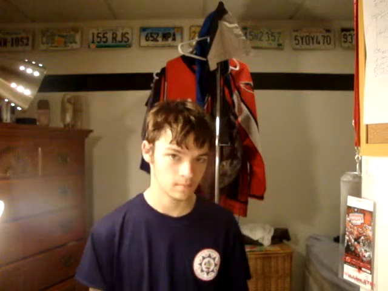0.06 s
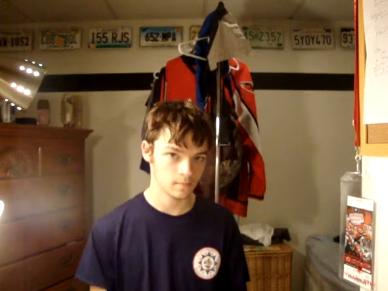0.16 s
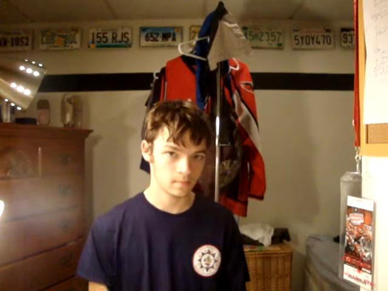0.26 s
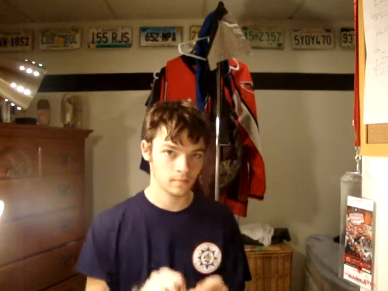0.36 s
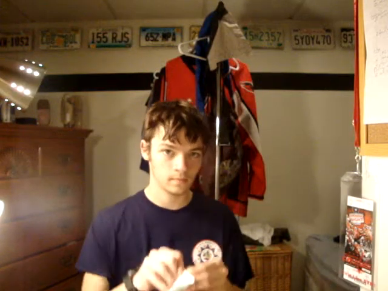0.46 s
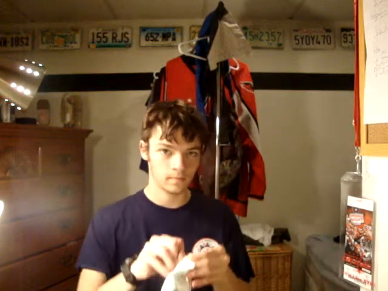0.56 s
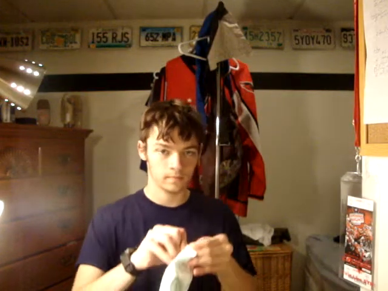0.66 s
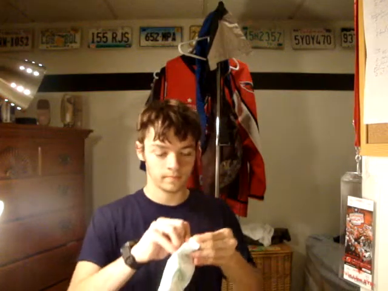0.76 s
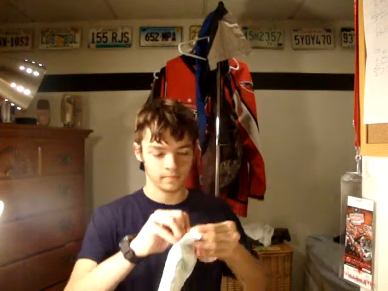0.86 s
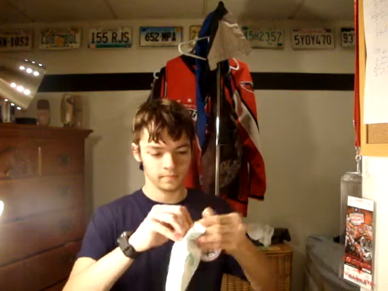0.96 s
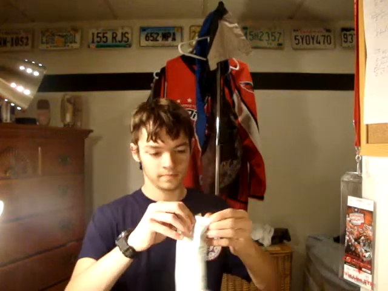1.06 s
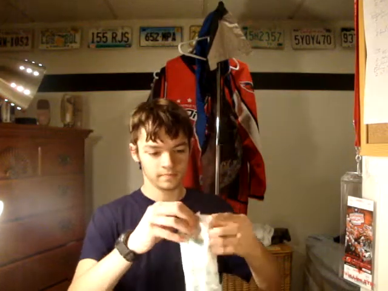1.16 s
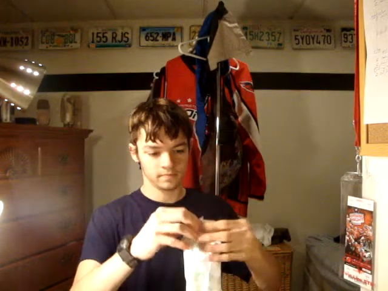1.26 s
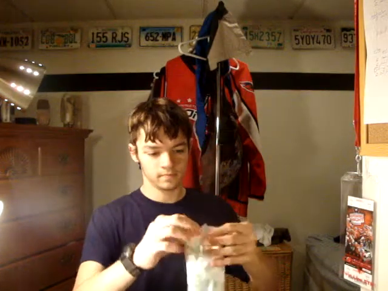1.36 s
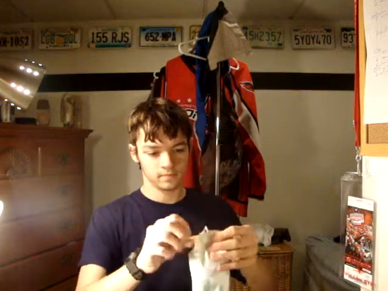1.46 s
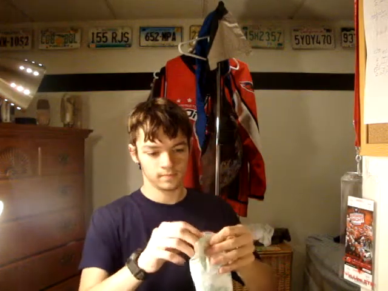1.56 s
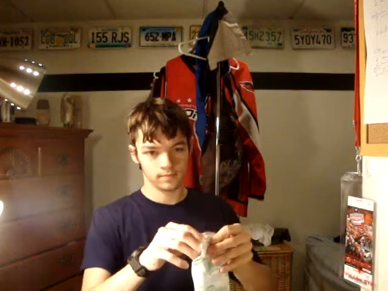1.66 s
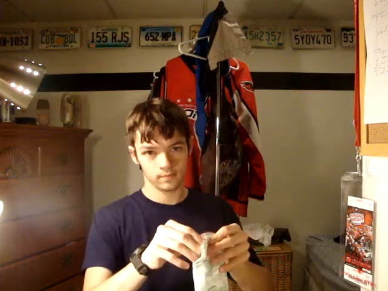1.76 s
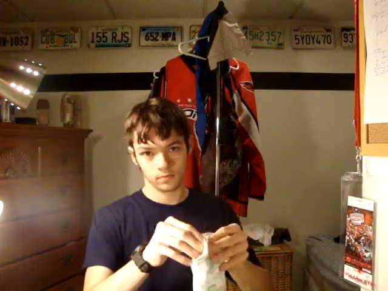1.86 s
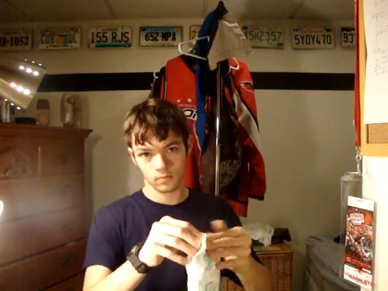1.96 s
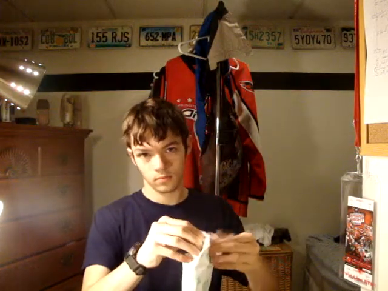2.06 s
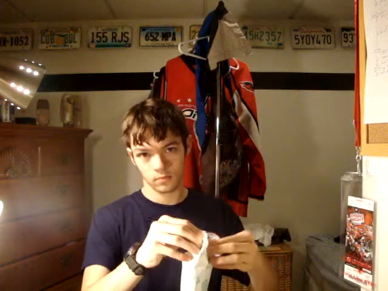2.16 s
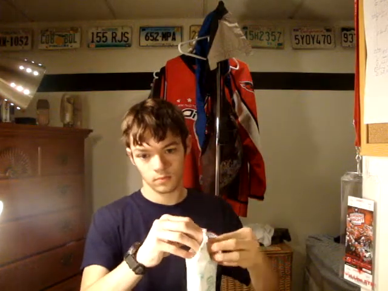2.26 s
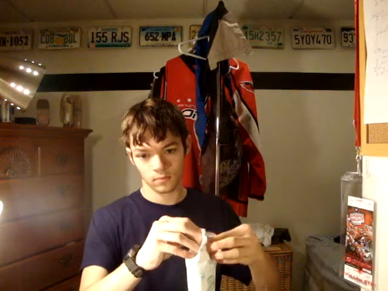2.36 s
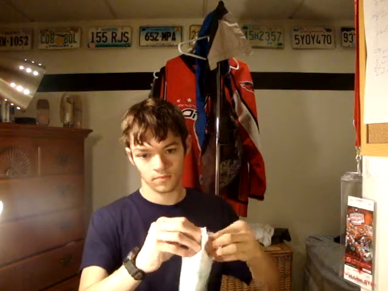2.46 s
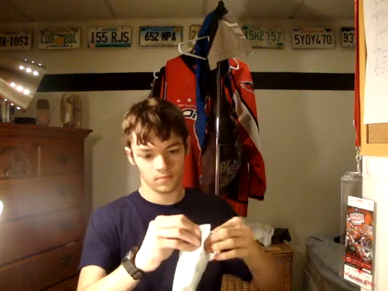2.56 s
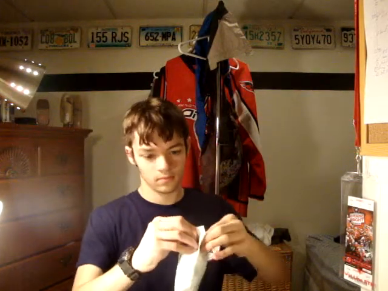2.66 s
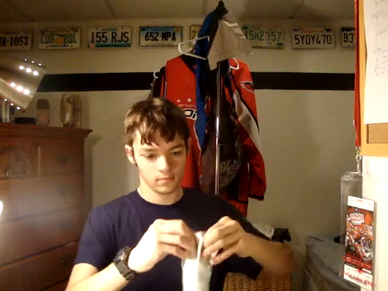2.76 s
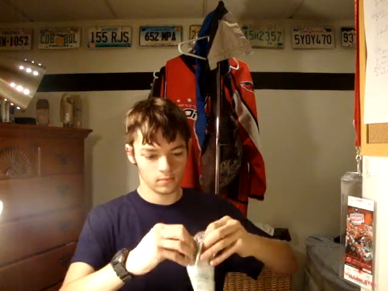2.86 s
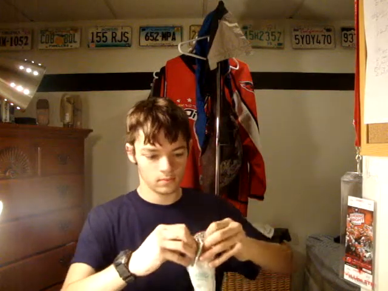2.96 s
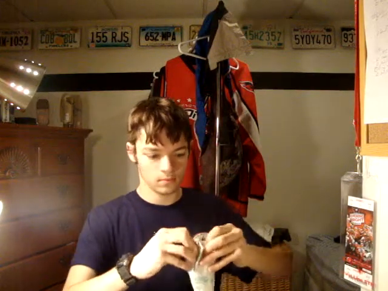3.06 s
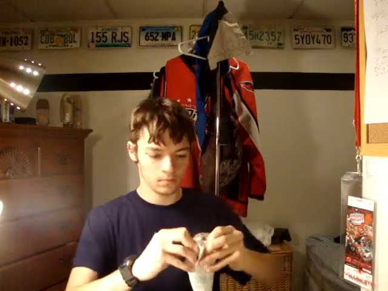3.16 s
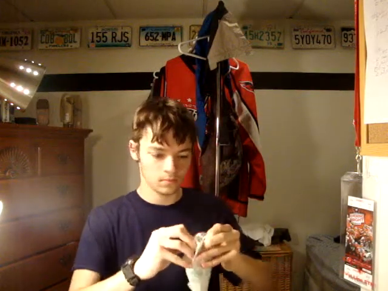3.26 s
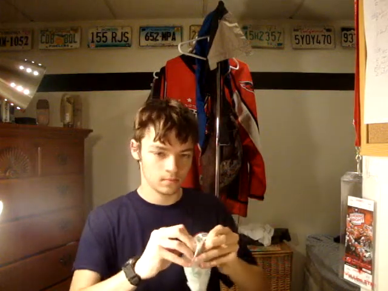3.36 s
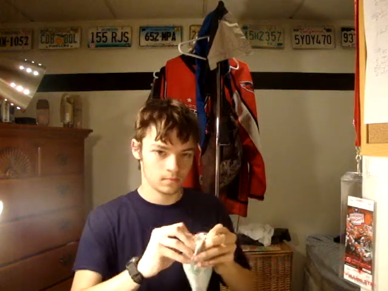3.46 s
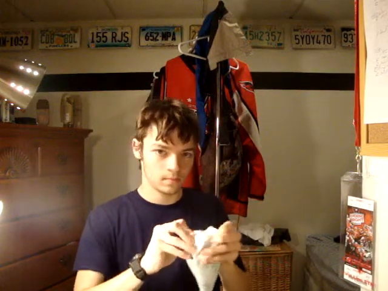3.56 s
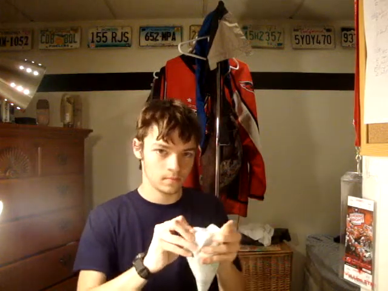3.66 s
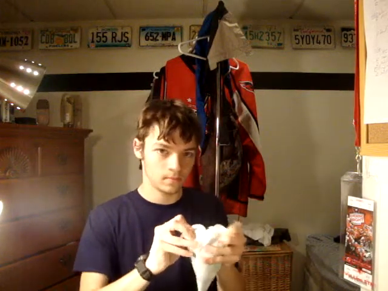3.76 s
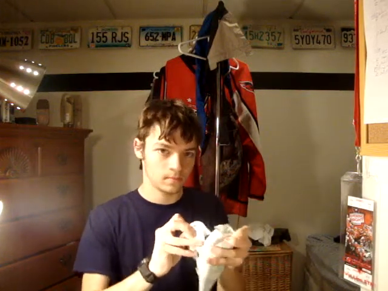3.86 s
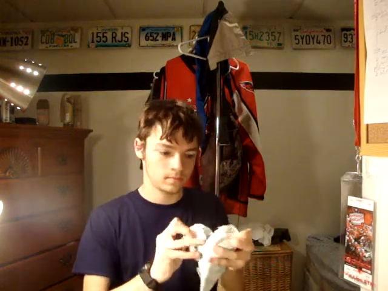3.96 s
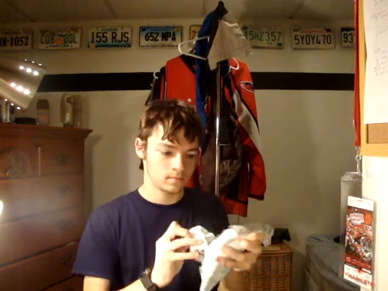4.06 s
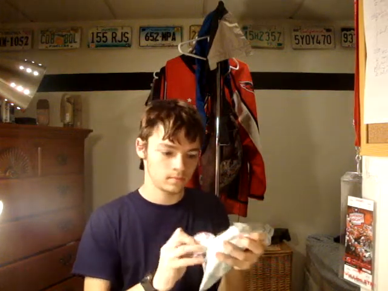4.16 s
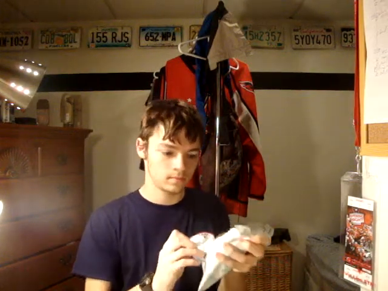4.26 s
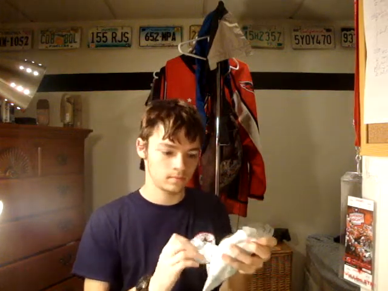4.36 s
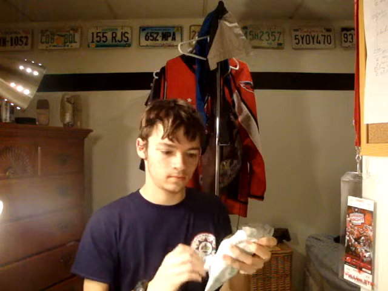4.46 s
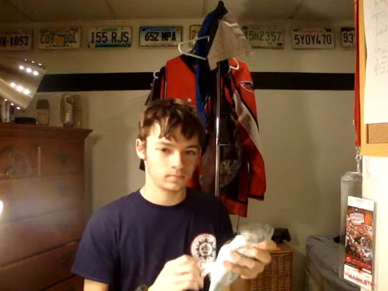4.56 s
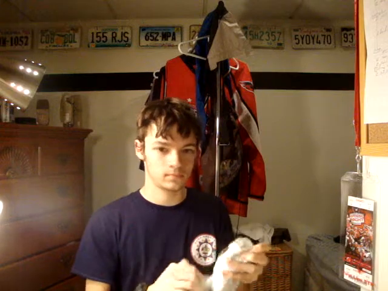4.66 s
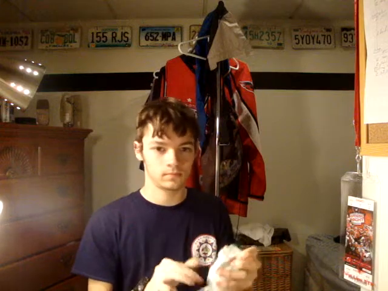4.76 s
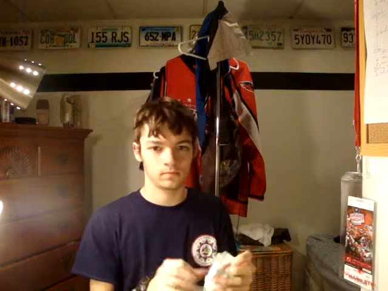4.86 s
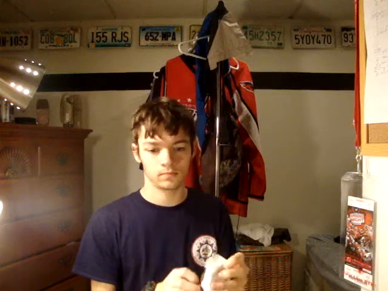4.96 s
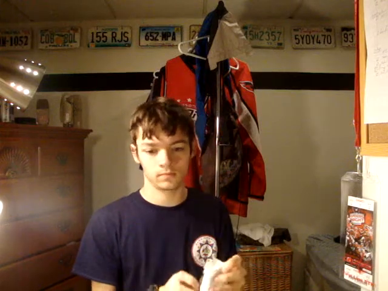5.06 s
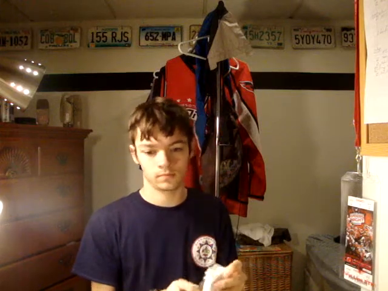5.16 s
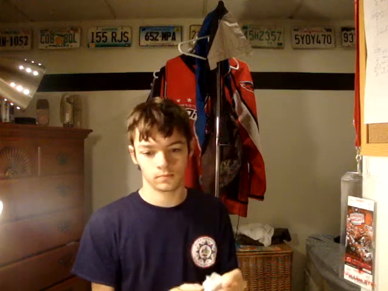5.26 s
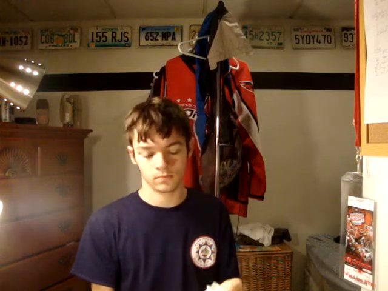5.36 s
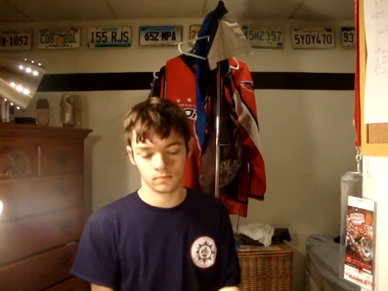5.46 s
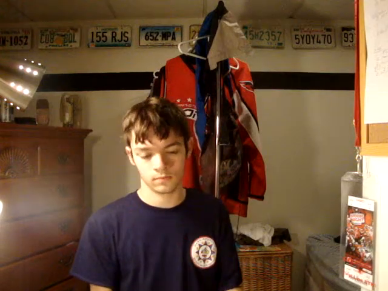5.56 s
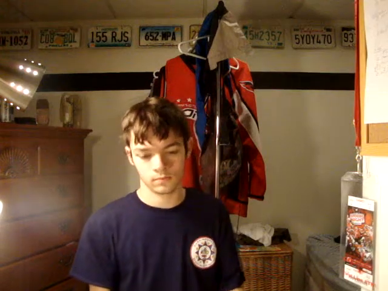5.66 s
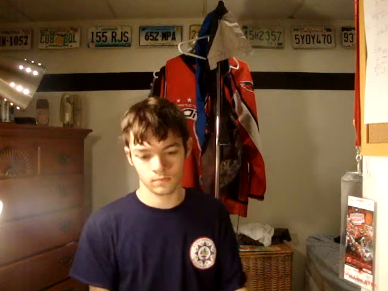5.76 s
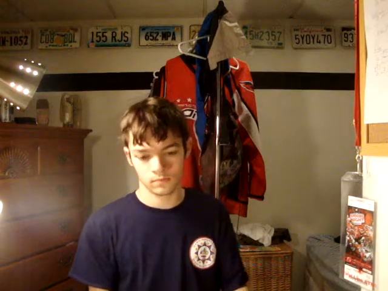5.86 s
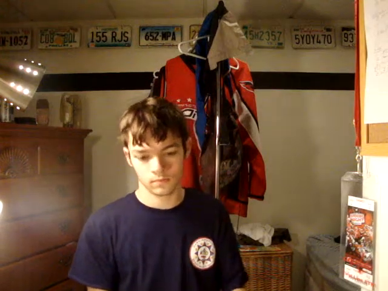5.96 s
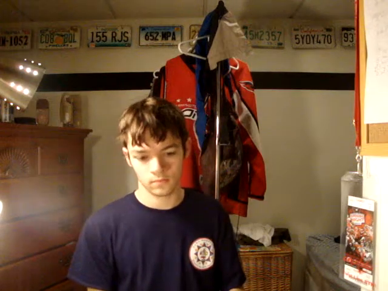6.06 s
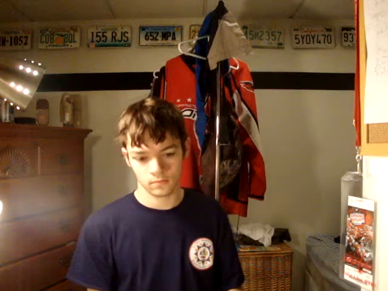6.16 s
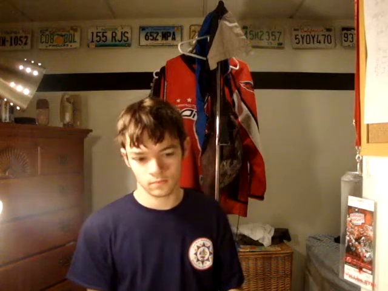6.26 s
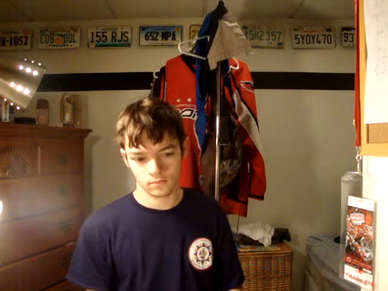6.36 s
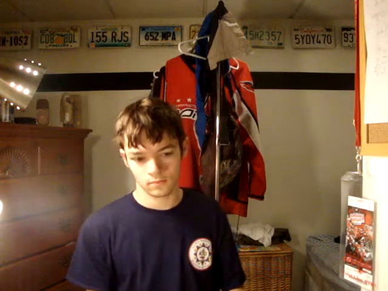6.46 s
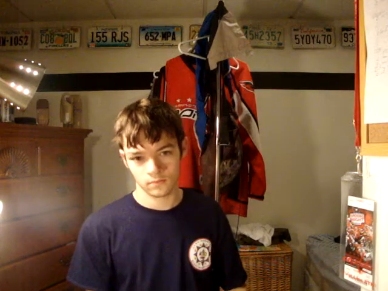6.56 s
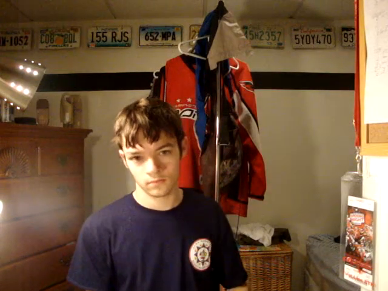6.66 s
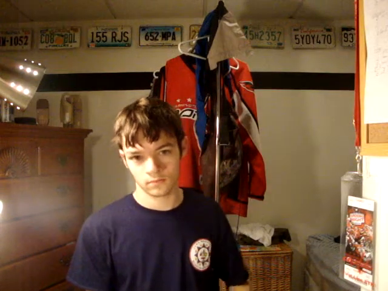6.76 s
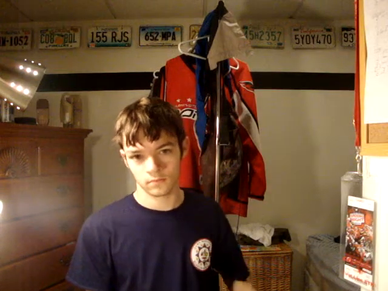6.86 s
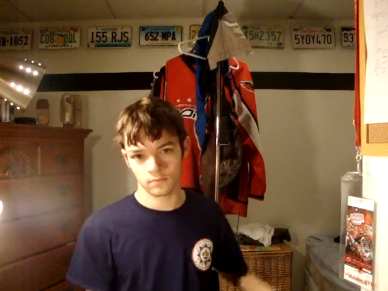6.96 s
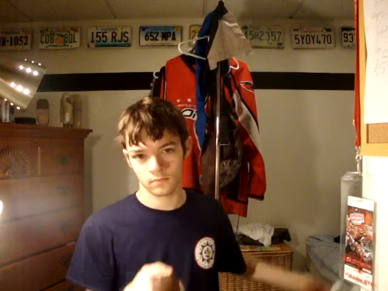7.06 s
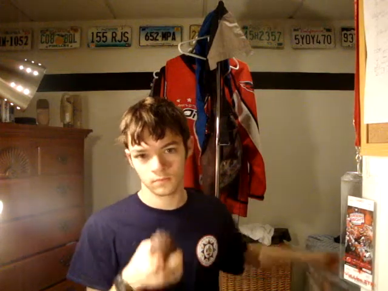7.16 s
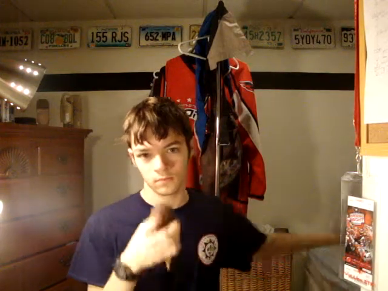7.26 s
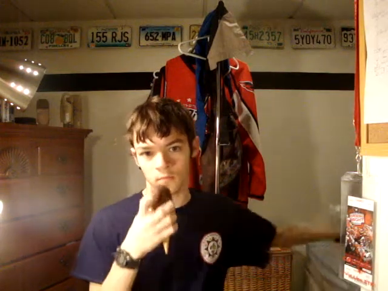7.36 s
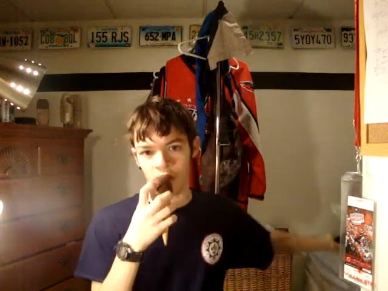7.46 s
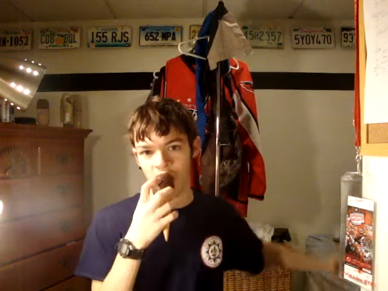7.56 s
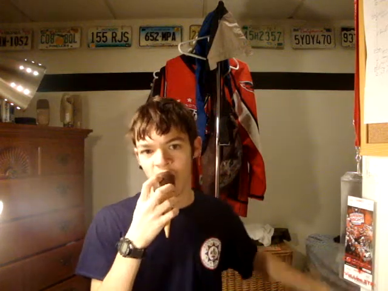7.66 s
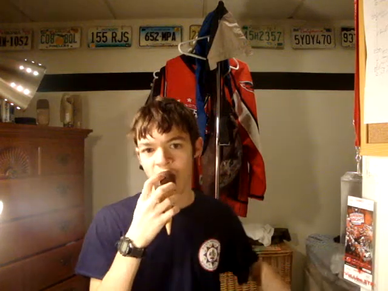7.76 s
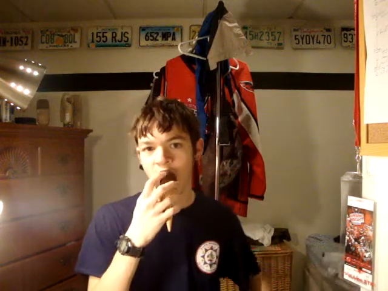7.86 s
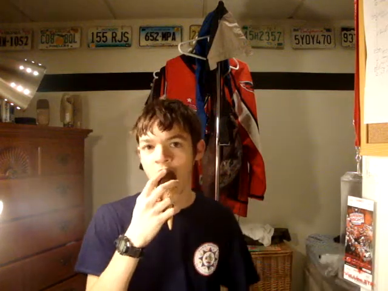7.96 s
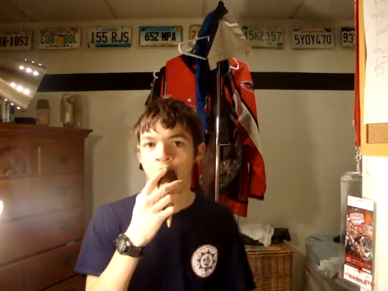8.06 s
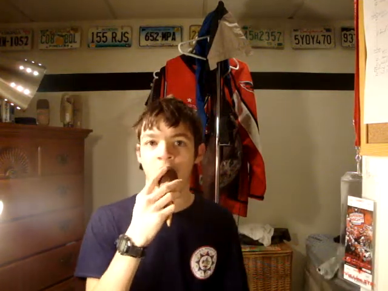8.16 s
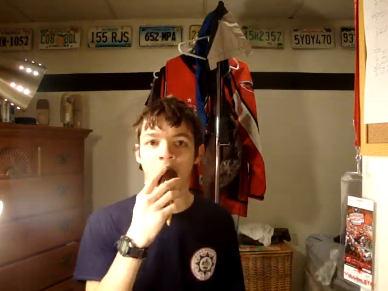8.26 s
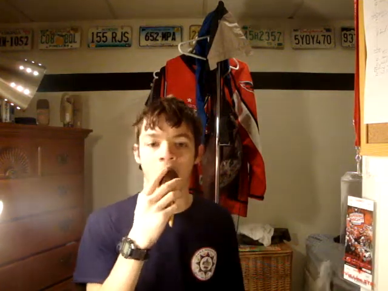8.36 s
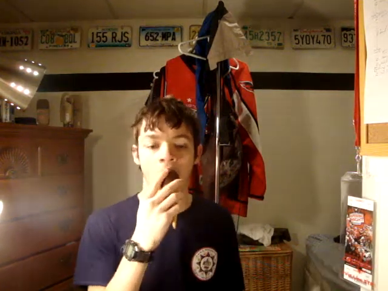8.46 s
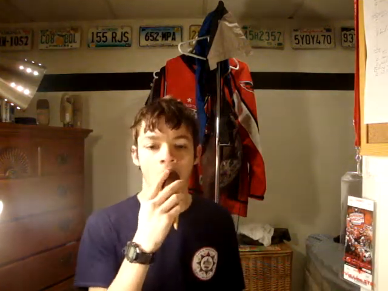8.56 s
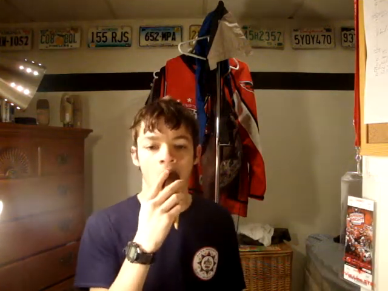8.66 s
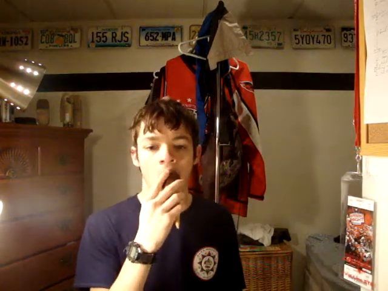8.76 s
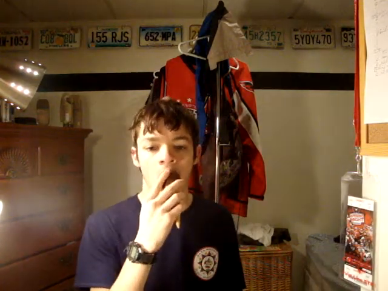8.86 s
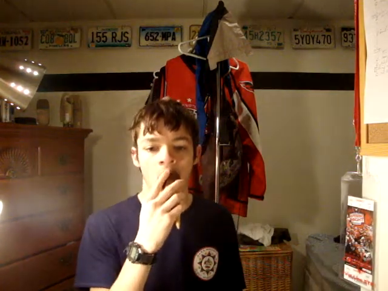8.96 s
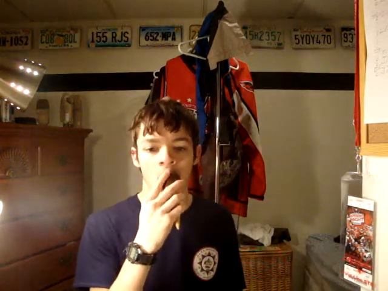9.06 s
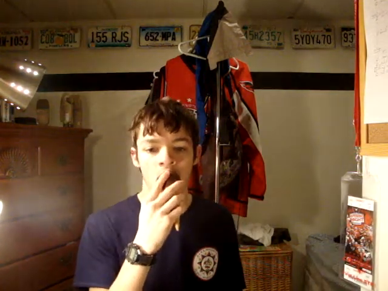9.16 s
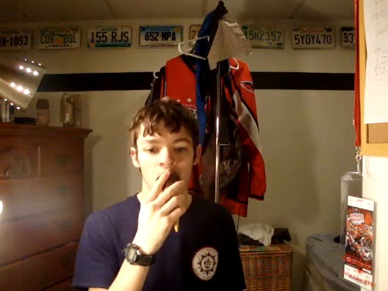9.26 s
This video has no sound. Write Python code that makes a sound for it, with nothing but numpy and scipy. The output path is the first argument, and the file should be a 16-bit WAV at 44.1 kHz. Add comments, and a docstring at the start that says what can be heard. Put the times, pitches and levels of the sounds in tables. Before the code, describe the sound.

Close by, a paper wrapper is crumpled, snapped and torn open by hand in a small soft room over a faint electrical hum.

```python
"""A small soft room, the microphone close: hands crumple and tear a paper wrapper off a snack.
Creases snap as noise-struck panel resonances, over a crackle of tiny decaying sines that swells at each tear.
A short rasp of noise puffs, soft rustles and a dull resonant knock follow.
Short one-sided low pops, some upward and some downward, ride on hard snaps.
Steady sines of mains hum and coloured microphone hiss lie under it all, dip at set times and slowly return."""
import sys
import numpy as np
from scipy import signal
from scipy.fft import rfft, irfft
from scipy.io import wavfile
from scipy.ndimage import uniform_filter1d

SR = 44100
rng = np.random.default_rng(int(sys.argv[2]) if len(sys.argv) > 2 else 0)


def store_wav(level_fs):
    """Save 16-bit WAV to argv[1]."""
    pcm = np.round(np.clip(np.atleast_2d(level_fs), -1, 1) * 32767)
    wavfile.write(sys.argv[1], SR, pcm.T.astype(np.int16))


N = 410571


def amp(db):
    """Gain of a level in dB."""
    return 10 ** (np.asarray(db) / 20)


def evened(x):
    """Scales a signal to rms 1."""
    return x / np.sqrt(np.mean(x ** 2) + 1e-20)


def read(points, hz):
    """Reads a table of values over log frequency."""
    f, value = np.transpose(points)
    return np.interp(np.log(hz + 1), np.log(f + 1), value)


def add(mix, s, sound):
    """Mixes a sound in at time s."""
    part = mix[round(s * SR):][:len(sound)]
    part += sound[:len(part)]


def resonate(x, hz, width):
    """A two-pole resonance of gain 1 at its peak."""
    q = max(hz / width, .3)
    return signal.lfilter(*signal.iirpeak(np.clip(hz, 50, 15000), q, SR), x)


def coloured(x, points):
    """Shapes a long signal by a spectrum."""
    gain = amp(read(points, np.fft.rfftfreq(len(x), 1 / SR)))
    return irfft(rfft(x) * gain, len(x))


def snaps():
    """Creases that snap or softly rustle, and taut panels that ring on as decaying sines."""
    # creases loud enough to point at, before the paper's bass cut:
    # t/s, panel peak level/dB, panel f/Hz, run of after-cracks/s, bright crack level against the panel/dB
    snap_rows = [(0.119, -28, 4230, 0.042, -21), (0.166, -25.5, 2130, 0.018, 1.5),
                 (0.221, -24, 6000.0, 0.016, 0), (0.266, -19.5, 2140, 0.043, -9),
                 (0.383, -25.5, 4600.0, 0.018, 4), (0.397, -26, 3800.0, 0.0073, 6),
                 (0.443, -27, 1850, 0.01, 7.5), (0.62, -26.5, 3640, 0.011, -4),
                 (0.778, -20, 2700.0, 0.026, 4), (0.826, -24.5, 1390, 0.019, -8),
                 (0.936, -18, 2600, 0.024, -32), (0.971, -26.5, 2600.0, 0.064, -3),
                 (1.047, -25, 2340, 0.064, 0.5), (1.09, -19.5, 3670, 0.0079, -16),
                 (1.107, -22, 2600.0, 0.018, 3), (1.171, -24, 2820, 0.012, -0.5),
                 (1.322, -18, 2800.0, 0.009, 2), (1.347, -22.0, 890, 0.0074, 0),
                 (1.391, -24.5, 2670, 0.07, -5), (1.453, -29.5, 2600.0, 0.033, -3),
                 (1.578, -17.5, 940, 0.02, 3.5), (1.603, -25.5, 2500.0, 0.026, -21),
                 (1.691, -25.5, 1420, 0.021, 2.5), (1.74, -25.5, 2080, 0.081, -8),
                 (1.764, -19, 4030, 0.041, -16), (1.779, -24.5, 3200.0, 0.044, -2),
                 (1.803, -21.5, 4030, 0.015, -20), (1.83, -23, 1300.0, 0.014, 0),
                 (1.845, -26, 6600.0, 0.13, -2), (1.898, -27, 5540, 0.036, 1),
                 (1.966, -25.5, 2650, 0.04, -7), (2.023, -22.5, 3020, 0.052, -2),
                 (2.038, -24.5, 2700.0, 0.015, -1), (2.106, -13.5, 4200.0, 0.04, -15),
                 (2.134, -19.5, 3280, 0.061, -3), (2.145, -16, 3800.0, 0.024, -21),
                 (2.248, -17.5, 2430, 0.033, -3.5), (2.311, -20.5, 3040, 0.015, -13),
                 (2.372, -26, 2620, 0.046, 0), (2.419, -21.5, 4070, 0.014, 4.5),
                 (2.454, -23, 3400.0, 0.012, -8), (2.504, -13.5, 3800, 0.016, -8),
                 (2.523, -18.5, 2700.0, 0.009, 1), (2.54, -18.5, 3000.0, 0.0092, 4),
                 (2.56, -16.0, 2630, 0.05, -9), (2.618, -26.5, 2670, 0.12, 5),
                 (2.794, -18.5, 3900, 0.065, -3.5), (2.828, -17, 2670, 0.05, -2.5),
                 (2.859, -16.5, 4270, 0.048, -7), (2.905, -24, 1580, 0.0047, -2),
                 (3.014, -26, 3560, 0.039, 10), (3.146, -22.5, 2480, 0.055, 1),
                 (3.204, -17.0, 4900.0, 0.052, -25), (3.231, -23, 1260, 0.044, 3),
                 (3.297, -18.5, 5430, 0.02, -10), (3.433, -19, 2670, 0.039, -8.5),
                 (3.48, -19, 3900.0, 0.044, -16), (3.502, -17, 2800.0, 0.019, -6),
                 (3.523, -16, 2640, 0.078, -3), (3.562, -13, 2930, 0.085, -6),
                 (3.593, -12.5, 3200.0, 0.031, -16), (3.625, -13, 3800, 0.017, -28),
                 (3.702, -27.5, 4330, 0.01, 3), (3.737, -20, 3900.0, 0.013, -1),
                 (3.76, -9.5, 4840, 0.066, -16), (3.782, -18.5, 2650, 0.17, 1),
                 (3.812, -20.5, 2930, 0.068, 8), (3.937, -19.5, 2770, 0.043, -4),
                 (3.948, -17.5, 4300.0, 0.015, -16), (4.017, -22.5, 3220, 0.038, 3),
                 (4.037, -24, 4400.0, 0.0098, 13), (4.062, -15, 4260, 0.056, -4.5),
                 (4.105, -23.0, 3000.0, 0.019, 5), (4.125, -28, 3200.0, 0.017, 7),
                 (4.138, -31, 3000.0, 0.0094, 14.5), (4.177, -33.5, 2600.0, 0.011, 12),
                 (4.212, -27, 1400.0, 0.027, 14.5), (4.222, -24.5, 3000.0, 0.0069, -1),
                 (4.303, -23.5, 1350, 0.04, -5), (4.34, -25, 2100.0, 0.0097, 3),
                 (4.369, -21.5, 1640, 0.013, 5), (4.394, -22, 3100.0, 0.052, -4),
                 (4.431, -23.5, 2420, 0.036, 2), (4.444, -26, 4450, 0.026, -24),
                 (4.486, -20, 5870, 0.043, -7), (4.507, -22.0, 3260, 0.082, 0),
                 (4.621, -24, 4170, 0.013, 2.5), (4.637, -25.5, 4500.0, 0.0062, -5),
                 (4.703, -26.5, 2600, 0.084, -2.5), (4.933, -28.5, 2200.0, 0.085, 0),
                 (4.969, -19, 4500, 0.0073, -1), (5.001, -26.5, 2100.0, 0.018, -1),
                 (5.152, -23.0, 1720, 0.065, 0), (5.224, -24, 3160, 0.034, -23),
                 (5.238, -24.5, 3100.0, 0.015, 1.5), (5.249, -24.5, 3030, 0.014, 8),
                 (5.328, -24, 4800.0, 0.0079, -7), (5.354, -22, 5900.0, 0.024, -20),
                 (5.401, -17.5, 6350, 0.017, 4.5), (5.412, -18.5, 5740, 0.017, -11),
                 (5.419, -16.0, 5900, 0.026, -16), (5.467, -22, 2400.0, 0.017, 0),
                 (5.522, -19.5, 3850, 0.037, -18), (5.568, -34.5, 3800.0, 0.017, 7.5),
                 (5.582, -24.5, 3850, 0.011, -2), (5.642, -32.5, 5000.0, 0.018, 10.5),
                 (5.7, -23.5, 4430, 0.04, -11), (5.765, -31, 2800.0, 0.057, -1),
                 (5.781, -21, 3220, 0.039, 0.5), (5.824, -21.5, 2500.0, 0.03, 4),
                 (5.847, -26.5, 3400.0, 0.019, 11), (5.935, -21.5, 4730, 0.03, -4),
                 (5.958, -22.0, 3280, 0.016, -4), (5.969, -20.5, 3230, 0.042, 0),
                 (5.981, -19.5, 3280, 0.037, -8), (6.021, -26.5, 1500.0, 0.049, 10.5),
                 (6.111, -25.5, 5100.0, 0.0069, 7), (6.167, -15, 4900.0, 0.02, -4),
                 (6.196, -24.5, 3460, 0.046, -11), (6.229, -24, 2880, 0.052, -23),
                 (6.279, -17, 3100, 0.026, -15), (6.372, -22.0, 2680, 0.0089, 0),
                 (6.391, -17, 4160, 0.017, 2), (6.409, -20.5, 1520, 0.0084, 8.5),
                 (6.51, -13.5, 5600, 0.027, -12), (6.566, -24.5, 3440, 0.058, 4),
                 (6.621, -21.5, 2110, 0.062, -5), (6.674, -17, 2250, 0.052, -3),
                 (6.795, -35, 1900.0, 0.02, 2), (6.969, -24.5, 3660, 0.046, 2),
                 (6.984, -36.5, 1010, 0.054, -4), (7.1, -25.5, 5440, 0.052, -24),
                 (7.178, -38.5, 2200.0, 0.094, 4), (7.713, -33, 2130, 0.054, 7),
                 (8.495, -33.5, 4800, 0.063, -9), (8.8, -33.5, 2450, 0.066, -1),
                 (8.845, -34.5, 3400.0, 0.055, 4), (8.933, -37.5, 2760, 0.029, -7),
                 (8.962, -34, 5400.0, 0.024, 9)]
    # softer rustles that swell in without a crack: same columns
    rustle_rows = [(6.452, -34, 1500.0, 0.029, -2), (6.46, -25, 875, 0.021, 5),
                   (6.59, -19, 2340, 0.054, -7), (6.702, -20.5, 5000.0, 0.055, -19),
                   (6.722, -18.5, 4970, 0.031, -8), (6.922, -40.5, 1210, 0.025, 2),
                   (7.25, -37, 1600.0, 0.052, -13), (7.272, -30, 5600, 0.072, -24),
                   (8.112, -41, 800.0, 0.04, -4), (8.132, -35, 2200.0, 0.022, -9),
                   (8.186, -36, 1000.0, 0.022, 2), (8.224, -33, 1010, 0.041, 10),
                   (8.643, -42.5, 800, 0.016, 4), (8.712, -36.5, 2030, 0.031, 0.5)]
    # panels ringing clearly after a snap: t/s, peak level/dB, f/Hz, t60/s
    ring_rows = [(0.2663, -20.5, 1465, 0.035), (0.383, -21.5, 4900, 0.02), (0.779, -25.5, 1750, 0.03),
                 (0.937, -28.5, 2150, 0.02), (0.938, -24, 3430, 0.016), (7.713, -44, 1000, 0.081),
                 (7.715, -46, 1510, 0.099), (8.726, -42, 1875, 0.067), (8.8, -35, 2220, 0.037),
                 (8.802, -35, 2520, 0.043)]
    out = np.zeros(N)
    for rows, snapping in ((snap_rows, True), (rustle_rows, False)):
        noise = rng.standard_normal((len(rows), 2, 6000))
        chances = rng.random(noise.shape)
        for row, row_noise, chance in zip(rows, noise, chances):
            add(out, *crease(row, row_noise, chance, snapping))
    t = np.arange(6000) / SR
    for s, db, hz, t60 in ring_rows:
        add(out, s, amp(db - 60 * t / t60) * np.sin(2 * np.pi * hz * t))
    return out


def crease(row, noise, chance, snapping):
    """Small cracks excite the panel, a bright crack and the wider sheet; a snap adds a sharp click."""
    snap_rise_s, rustle_rise = 0.0017, 0.19  # rustle rise is a share of the run
    typical_click = 3.7
    s, db, hz, run, bright_db = row
    panel_noise, bright_noise = noise
    u, size = chance
    t = np.arange(len(panel_noise)) / SR
    fading = amp(-20 * t / max(run, .004))

    cracks = (u < 350 / SR) * 0.8 * size ** 2 * fading  # about 350 per second
    cracks[0] = snapping
    crack_decay = amp(-60 * t[:900] / 0.011)  # t60 11 ms
    shape = signal.oaconvolve(cracks, crack_decay)[:len(t)]
    rise = snap_rise_s if snapping else rustle_rise * run
    shape = np.minimum(t / rise, 1) * (shape + 0.3 * fading)  # the sheet rustles on as it settles
    click = snapping * 2 * typical_click * size[0] * (t == t[50])

    panel = resonate(panel_noise * shape + click, hz, .3 * hz + 300)
    panel = resonate(panel, hz, 1.8 * hz)
    burst = bright_noise * shape * fading ** 0.23 + click  # the treble dies sooner
    # every crease has its own few bright spots
    facets = sum(resonate(burst, f, 900) for f in 2500 + 7000 * size[1:4])
    crack = resonate(resonate(burst, 5000, 8000), 5500, 11000) + facets
    sheet = resonate(bright_noise * shape, 0.23 * hz + 300, 0.41 * hz)  # the wider sheet answers lower
    panel, crack, sheet = [p / abs(p).max() for p in (panel, crack, sheet)]
    return s, amp(db) * (panel + amp(bright_db) * crack + 0.5 * sheet)


def crackle():
    """Countless tiny creases in clumps, each a few cycles long; larger folds sound lower."""
    # crackle colour: f/Hz, level per Hz/dB
    paper_colour = [(300, -21), (450, 1), (620, -6), (850, -11.5), (1200, 2), (1700, -3.5), (2600, 0.5),
                    (4000, 0.5), (6000, 0.5), (8000, -2), (10000, -25)]
    clump = evened(uniform_filter1d(uniform_filter1d(rng.standard_normal(N), 500), 500))
    chance = 6000 / SR * amp(3.1 * clump)  # 6000 creases per second, denser in the clumps
    sizes = amp(5.05 * np.minimum(rng.exponential(1, N), 4))
    hits = (rng.random(N) < chance) * sizes * rng.choice([-1, 1], N)
    # neighbouring creases are alike in size
    region = evened(uniform_filter1d(uniform_filter1d(rng.standard_normal(N), 300), 300))
    fold = (2.5 * region + rng.uniform(0, 21, size=N)).astype(int) % 24
    t = np.arange(400) / SR
    out = np.zeros(N)
    for k, hz in enumerate(np.geomspace(300, 10000, 24)):
        grain = np.sin(2 * np.pi * hz * t) * np.exp(-hz * t / 2.2)
        grain *= amp(read(paper_colour, hz)) * np.sqrt(hz) / np.linalg.norm(grain)
        add(out, 0, signal.oaconvolve(hits * (fold == k), grain))
    return effort() * evened(out)


def effort():
    """Crackle strength: the handling, plus a swell that rises, holds and lets go at each tear."""
    # the hands working the paper: t/s, crackle level/dB
    handling = [(0.0, -48.5), (0.35, -50.5), (0.5, -48.5), (0.88, -43.5), (1.18, -38.5), (1.22, -49.5),
                (2.49, -41), (2.62, -37.5), (2.76, -44.5), (2.96, -47.5), (3.46, -37), (3.64, -37),
                (3.72, -43.5), (3.87, -42.5), (4.72, -46), (4.82, -57), (4.97, -45), (5.4, -41.5),
                (5.75, -54), (5.88, -44), (6.7, -38), (6.85, -61.5), (6.98, -59.5), (7.3, -56.5),
                (7.6, -58.5), (8.05, -59.5), (8.21, -50), (8.32, -60), (8.48, -61), (8.52, -49),
                (8.68, -60.5), (8.85, -52.5), (9.02, -60)]
    # the paper rips: start t/s, length/s, crackle level/dB
    tears = [(1.274, 0.025, -31.5), (2.774, 0.092, -34.5), (3.497, 0.081, -29), (3.745, 0.059, -32),
             (5.76, 0.063, -34.5), (6.704, 0.0043, -32)]
    attack_s, release_s = 0.0074, 0.09
    t = np.arange(N) / SR
    seconds, handling_db = np.transpose(handling)
    power = amp(np.interp(t, seconds, handling_db)) ** 2
    for s, length, db in tears:
        corners = s + np.cumsum([0, attack_s, length, release_s])
        swell = amp(db) * np.interp(t, corners, [0, 1, 1, 0])
        power = power + swell ** 2
    return np.sqrt(power)


def rasp():
    """A short rasp of slowing slips, each a click and a puff of noise into fixed resonances."""
    # the one rasp: start t/s, length/s, level before it fades/dB
    rasp_stroke = (7.407, 0.091, -35)
    # its resonances: f/Hz, width/Hz, relative level/dB
    rasp_body = [(1037, 270, 4.5), (2210, 1400, 2.5), (3840, 410, -6), (7000, 4200, 7.5)]
    attack_s, fade_db_per_s, release_db_per_s = 0.0046, 72, 296
    slips_per_s, slowing_per_s2 = 118, 500
    start, length, top_db = rasp_stroke
    t = np.arange(N) / SR - start
    on = (t > 0) & (t < length + .06)
    db = top_db - fade_db_per_s * t - release_db_per_s * np.maximum(t - length, 0)
    turns = np.cumsum(np.maximum(slips_per_s - slowing_per_s2 * t, 20) * on) / SR
    puffs = 1.7 + np.exp(-(turns % 1) / 0.45)
    drive = puffs * rng.standard_normal(N) * on
    drive += 5.0 * np.diff(np.floor(turns), prepend=0)  # a click as each slip begins
    body = sum(amp(g) * resonate(drive, hz, w) / np.sqrt(w) for hz, w, g in rasp_body)
    body = body / np.sqrt(np.mean(body[on] ** 2))
    return np.clip(t / attack_s, 0, 1) * amp(np.minimum(db, top_db)) * body


def thump():
    """A dull knock with a short rattle: an impulse and fading noise strike a few resonances."""
    # one soft knock: t/s, peak level/dB, resonances (f/Hz, width/Hz, relative level/dB)
    knock = (8.507, -35, [(230, 90, 0), (450, 200, -3), (820, 250, -4)])
    s, db, modes = knock
    t, out = np.arange(3000) / SR, np.zeros(N)
    rattle = rng.standard_normal(len(t)) * 0.53 * amp(-60 * t / 0.13)
    blow = rattle - signal.unit_impulse(len(t), 20)
    ring = sum(amp(g) * resonate(blow, hz, w) / w for hz, w, g in modes)
    add(out, s, amp(db) * ring / abs(ring).max())
    return out


def pops():
    """Short low pops, each a bell-shaped pulse of either sign."""
    # pops that ride on hard snaps: t/s, level at full swing/dB, signed swing (-1 to 1)
    pop_rows = [(0.785, -34.5, -0.93), (1.304, -37.5, -1), (2.04, -34.5, 0.88), (2.113, -28, -0.78),
                (2.127, -34, -0.94), (2.62, -32.5, 0.87), (2.811, -35, 0.99), (3.094, -35, 1),
                (3.523, -32.5, 0.93), (3.593, -33, 1), (3.765, -40, 0.87), (3.812, -41, 0.8),
                (5.399, -33, 0.54), (6.514, -34, 0.91)]
    out, t = np.zeros(N), np.arange(-100, 100) / SR
    for s, db, swing in pop_rows:
        add(out, s + t[0], swing * amp(db) * np.exp(-(t / 0.00057) ** 2))
    return out


def room(x):
    """Sparse reflections of random sign, each band dying at its own speed, in three alternating sets."""
    # decay of the soft room: f/Hz, t60/s
    room_decay = [(300, 0.058), (1000, 0.042), (3000, 0.042), (9000, 0.0058)]
    out, turn = np.zeros(N), np.pi * 7.0 * np.arange(N) / SR
    at = np.arange(100, SR // 2 - 20, 20)
    for k in range(3):  # the sound swings steadily between three sets of reflections
        taps = np.zeros(SR // 2)
        taps[at + rng.integers(0, 20, len(at))] = rng.choice([-1., 1.], len(at))
        hz, t, z = signal.stft(taps, SR, nperseg=128)
        decay = amp(-60 * t / read(room_decay, hz)[:, None])
        tail = signal.istft(z * decay, SR, nperseg=128)[1]
        share = np.sqrt(2 / 3) * abs(np.cos(turn + k * np.pi / 3))
        out += signal.oaconvolve(x * share, tail / np.linalg.norm(tail))[:N]
    return out


def background():
    """Hum sines and coloured hiss share one level, which drops quickly, holds and creeps back."""
    # mains hum: f/Hz, level within the hum/dB
    hum_tones = [(120, -8), (240, -30)]
    # microphone hiss colour: f/Hz, relative level per Hz/dB
    hiss_colour = [(20, -11.5), (80, -13.5), (105, 2), (180, 3.5), (350, 2), (700, -1.5), (1500, -8),
                   (3000, -13), (5000, -18), (8000, -13), (10000, -20.5)]
    # dips of hum and hiss: t/s, depth before smoothing/dB
    dips = [(3.55, 2), (3.79, 8), (5.4, 5.5), (6.51, 2)]
    hum_db, hiss_db = -50, -8  # the hiss level is relative to the hum's
    hold_s, return_s = 0.37, 0.8  # return_s is a time constant
    t = np.arange(N) / SR
    hum = sum(amp(db) * np.sqrt(2) * np.sin(2 * np.pi * (hz * t + rng.random())) for hz, db in hum_tones)
    hiss = evened(coloured(rng.standard_normal(N), hiss_colour))
    each_dip = [(t > s) * db * np.exp(-np.maximum(t - s - hold_s, 0) / return_s) for s, db in dips]
    dip_db = uniform_filter1d(np.max(each_dip, 0), 1300)
    return amp(hum_db - dip_db) * (hum + amp(hiss_db) * hiss)


def scene():
    """Paper, rasp and knock in the room, with the pops and the electrical background added dry."""
    bass_cut = signal.butter(4, 330, "high", fs=SR, output="sos")  # small sheets radiate no bass
    paper = signal.sosfilt(bass_cut, snaps() + crackle() + rasp())
    near = paper + thump()
    return (near + amp(-13.0) * room(near) + pops() + background())[None]


def record(dry):
    """The recorder's band limit: a steep low-pass."""
    edge_hz = 10250
    low_pass = signal.firwin(511, edge_hz, window=("kaiser", 9), fs=SR)
    return signal.oaconvolve(dry, low_pass[None], "same")


dry = scene()
out = record(dry)
store_wav(out)
```